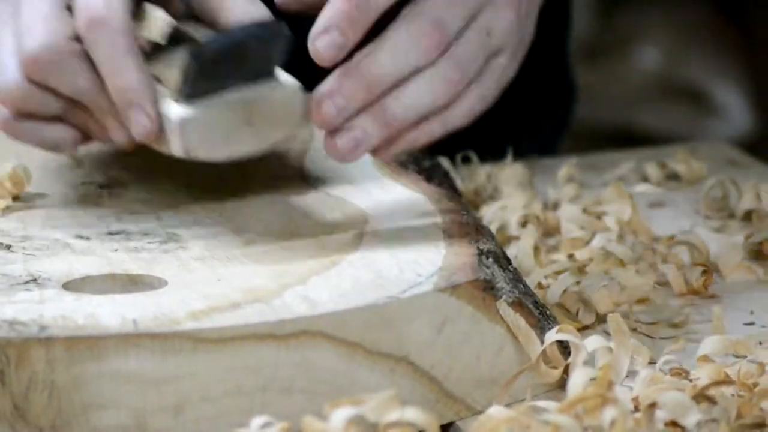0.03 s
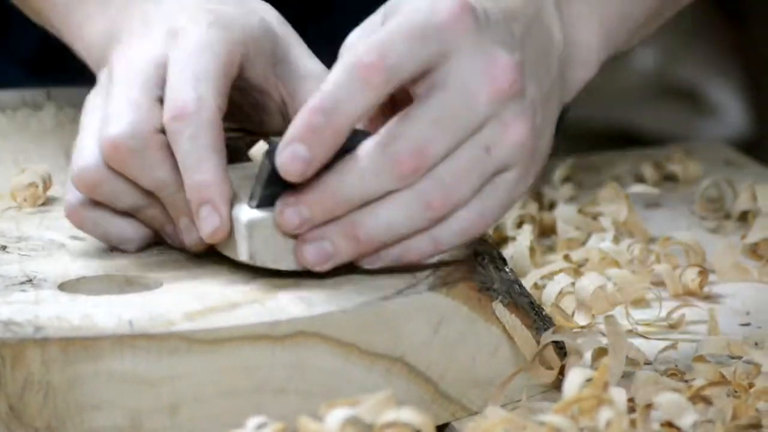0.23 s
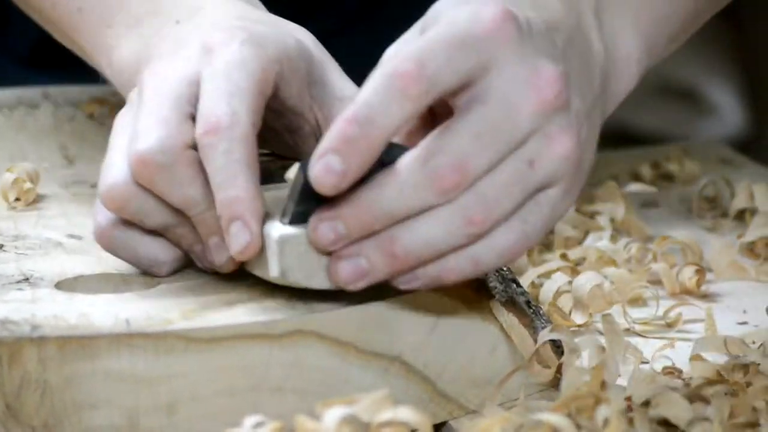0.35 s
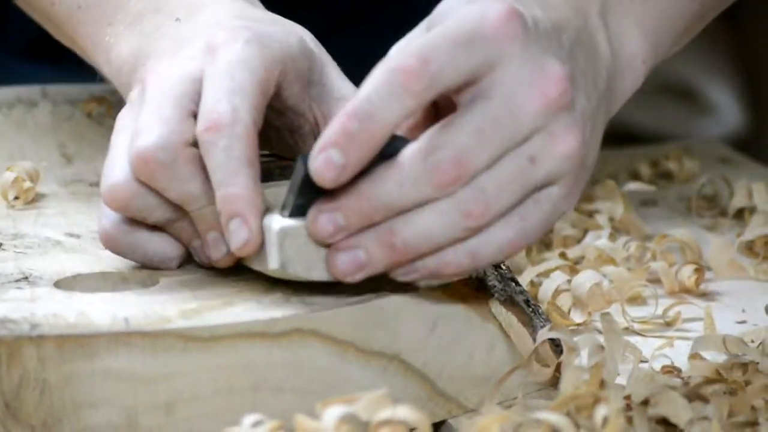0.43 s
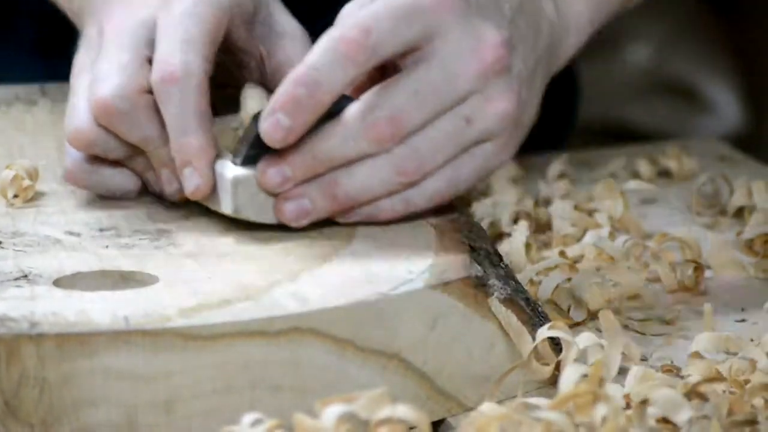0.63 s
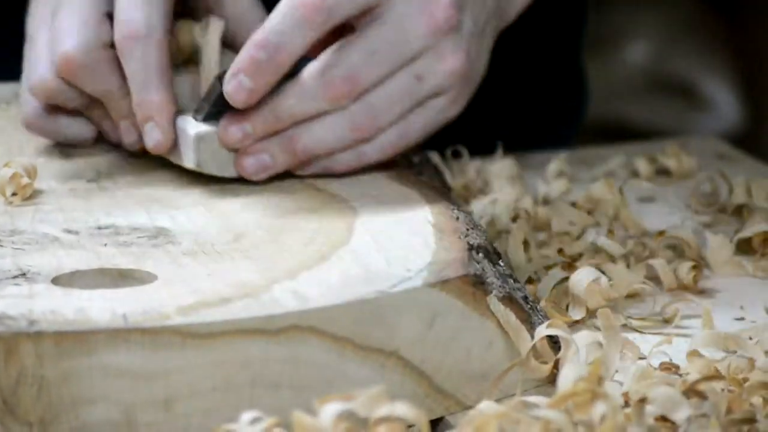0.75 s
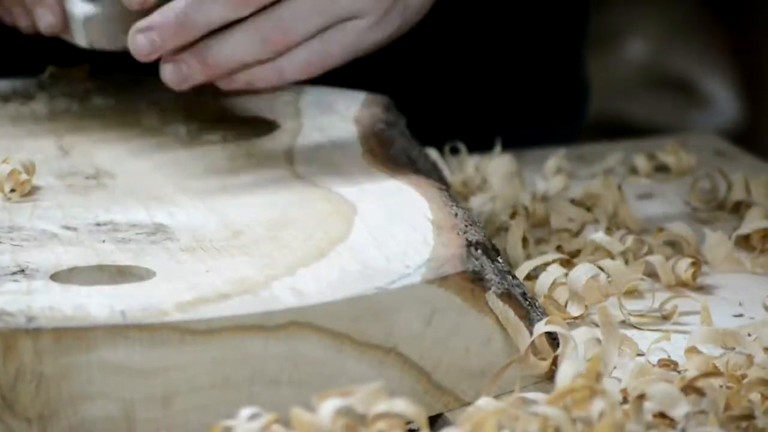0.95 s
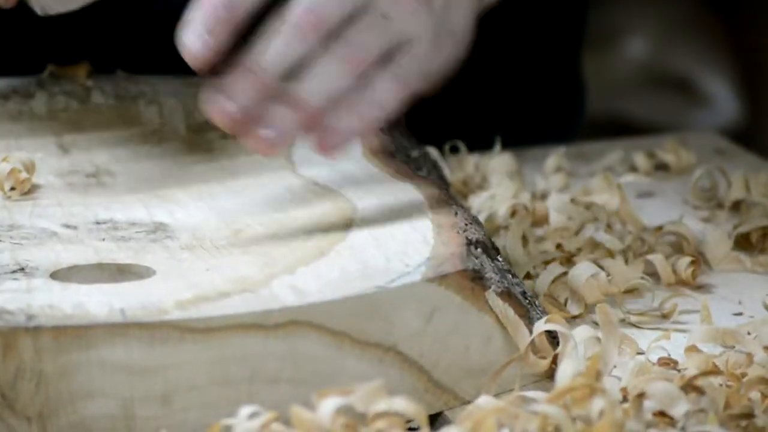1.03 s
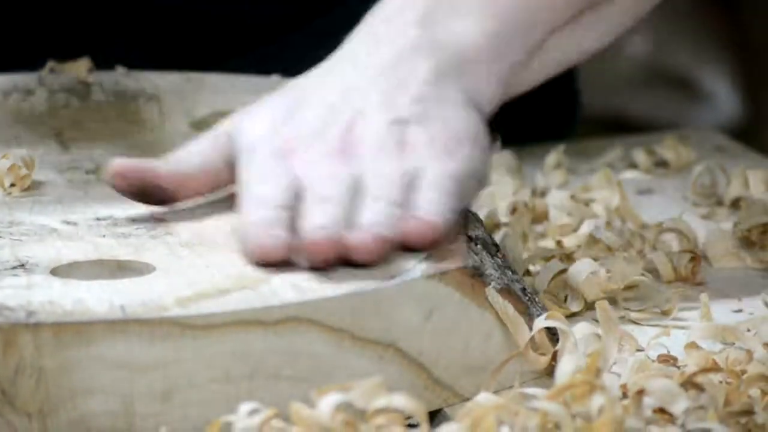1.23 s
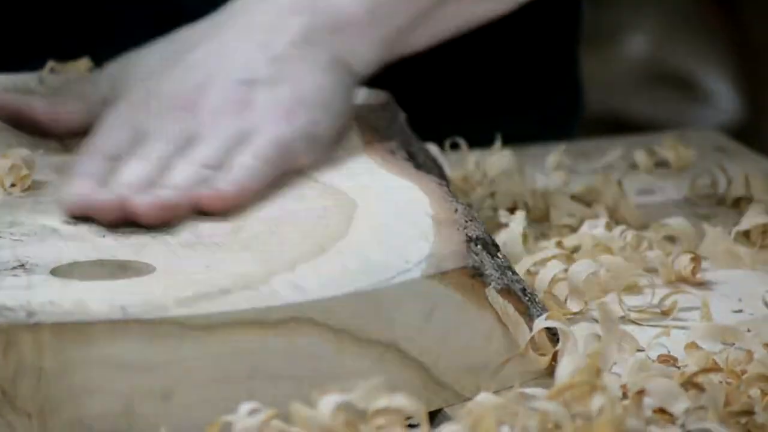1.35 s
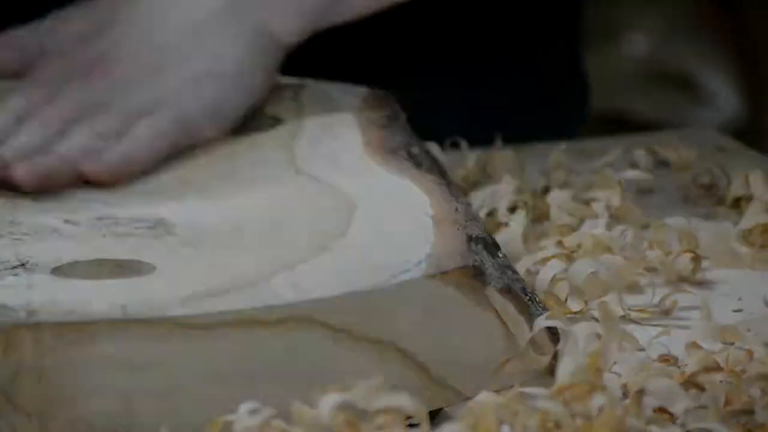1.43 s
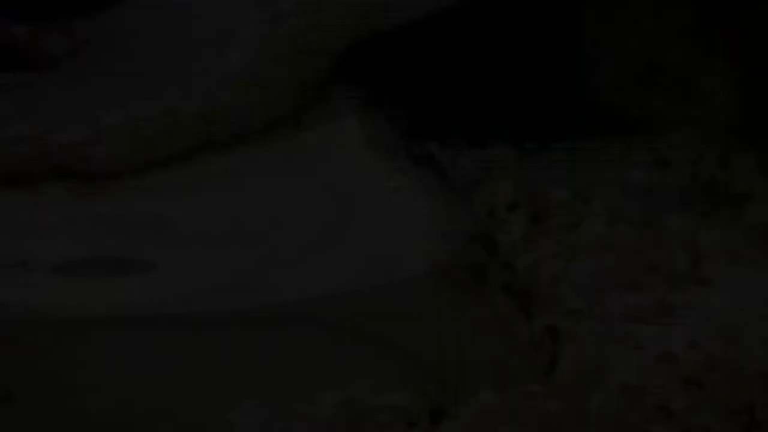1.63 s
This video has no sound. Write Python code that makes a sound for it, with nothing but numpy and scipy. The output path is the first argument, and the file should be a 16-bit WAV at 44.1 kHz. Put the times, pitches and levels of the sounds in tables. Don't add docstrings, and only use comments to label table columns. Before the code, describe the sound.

A small wooden hand plane knocks down, scrapes one shaving off thick wood, then a palm brushes

```python
import sys
import numpy as np
from scipy import signal
from scipy.fft import rfft, irfft
from scipy.io import wavfile
from scipy.ndimage import uniform_filter1d

SR = 44100
rng = np.random.default_rng(int(sys.argv[2]) if len(sys.argv) > 2 else 0)


def elevation(decibels):
    levels = np.asarray(decibels, float)
    return 10 ** (levels / 20)


def materialize(psi):
    bounded = np.clip(np.atleast_2d(psi).T, -1, 1)
    quanta = np.round(bounded * 32767).astype(np.int16)
    wavfile.write(sys.argv[1], SR, quanta)


N = 74970
T = np.arange(N) / SR
LEFT_RIGHT = np.array([[1], [-1]])

# frequency in Hz, level in dB, decay time t60 in s.
SEAT_MODES = [(148, -13, 0.21), (183, -10, 0.29), (220.4, -11, 0.42), (291.8, -6.5, 0.28), (328.6, 2, 0.27),
              (386.2, 2.5, 0.14), (476, -33.5, 0.4), (530, -16, 0.25), (647.6, 1.5, 0.17),
              (691.6, -12, 0.27), (765, -1.5, 0.096), (988, -50, 0.026), (1139, -9, 0.21),
              (1085, -23, 0.052)]
PRESSED_T60_SHARE, CONTACT_WANDER_DB = 0.65, 2.5


def level(x, db):
    return x * elevation(db) / np.sqrt(np.mean(x ** 2))


def curve(rows):
    times, db = np.array(rows).T
    return elevation(np.interp(T, times, db))


def colour(x, points):
    hz, db = np.array(points).T
    f = np.maximum(np.fft.rfftfreq(x.shape[-1], 1 / SR), 1)
    gain = elevation(np.interp(np.log(f), np.log(hz), db))
    return irfft(rfft(x) * gain, x.shape[-1])


def ring(x, hz, t60):
    radius = np.exp(-np.log(1000) / (t60 * SR))
    angle = 2 * np.pi * hz / SR
    return signal.lfilter([0, radius * np.sin(angle)], [1, -2 * radius * np.cos(angle), radius ** 2], x)


def walk(rate):
    hold = int(SR / rate)
    steps = np.repeat(rng.standard_normal(N // hold + 1), hold)
    smooth = uniform_filter1d(uniform_filter1d(steps, hold), hold)[:N]
    return smooth / smooth.std()


def grains(rate, spread_db):
    chance, size, sign = rng.random(N), rng.exponential(size=N), rng.standard_normal(N)
    clicks = np.clip(1 - chance * SR / rate, 0, 1) ** 0.5
    return level(clicks * elevation(spread_db * size) * sign, 0)


def body(modes, force, t60_share, wander_db):
    total = np.zeros(N)
    for k, (hz, db, t60) in enumerate(modes):
        drive = force * elevation(wander_db * walk(22.6))
        total += (-1) ** k * elevation(db) * ring(drive, hz, t60 * t60_share)
    return total


def workshop():
    # frequency in Hz, level in dB.
    murmur = [(15, -68), (25, -27), (148, -17), (276, -5.5), (361, -2), (425, -10.5), (654, -6),
              (7420, -30.5), (15800, -42)]
    # frequency in Hz, dB below the common murmur.
    murmur_side = [(30, -6), (250, -15.5), (2000, -4), (8000, -2.5), (15000, -2)]
    rise_db_per_s = 0.2
    whine_hz, whine_db = 15671, -76
    mid, side = colour(rng.standard_normal((2, N)), murmur)
    air = level(mid + colour(side, murmur_side) * LEFT_RIGHT, -51.5) * elevation(rise_db_per_s * T)
    phase = np.array([[0], [0.6]])
    return air + elevation(whine_db) * np.sqrt(2) * np.sin(2 * np.pi * whine_hz * T + phase)


def knocks():
    # start in s, level in dB, contact time in ms,
    # favoured pitch in Hz, free ringing before the hand damps it in s.
    contacts = [(0.2268, -21, 0.33, 330, 0.029), (0.2319, -12, 1.17, 301, 0.029),
                (.233, -21.5, 0.47, 664, 0.046), (0.2405, -29, 1.8, 447, 0.011),
                (0.251, -16, 2.2, 155, 0.028), (0.297, -30, 0.93, 210, 0.045),
                (.3675, -22.5, 0.87, 321, 0.12), (0.374, -13.5, 0.86, 183, 0.2),
                (0.395, -24, 0.84, 185, 0.11), (0.557, -31, 0.33, 366, 0.012),
                (0.629, -37, 0.78, 320, 0.029), (0.676, -33.5, 0.64, 377, 0.044),
                (.817, -25.5, 1.14, 330, 0.0087), (0.832, -36, 0.42, 335, .02),
                (.87, -29, 0.91, 216, 0.037), (.903, -28, 1.2, 221, 0.041),
                (1.1923, -24.5, 1.65, 233, 0.0058), (1.199, -31, 2.1, 288, 0.0088),
                (1.204, -23.5, 2, 183, 0.096)]
    # frequency in Hz, level in dB.
    rattle_colour = [(88, -46.5), (150, -19), (339, -1.5), (681, -8.5), (948, -25), (1110, -15.5),
                     (1370, -35), (1480, -31.5), (15500, -85)]
    rattle_db, rattle_s, rattle_rise_s = -14.5, 0.025, 0.0037
    soft_rattle_drop = 2.2
    spot_db_per_oct2, far_modes_db = 69, -25.5
    damped_db, damp_s, damped_db_per_s = -13, 0.0036, -88
    first_ring_s = 0.042

    out = np.zeros(N)
    rattle = level(colour(rng.standard_normal(N), rattle_colour), rattle_db)
    for start, db, ms, spot_hz, free_s in contacts:
        if start < contacts[4][0]:
            free_s = min(free_s, contacts[0][0] + first_ring_s - start)
        phase = (T - start) / (ms / 1000)
        age = np.maximum(T - start, 0)
        push = np.where((phase > 0) & (phase < 1), np.sin(np.pi * phase) ** 2, 0) / (ms * SR / 2000)
        wood = np.zeros(N)
        for hz, mode_db, t60 in SEAT_MODES:
            spot_db = max(-spot_db_per_oct2 * np.log2(hz / spot_hz) ** 2, far_modes_db)
            wood += elevation(mode_db + spot_db) * ring(push, hz, t60)
        grip_db = damped_db / (1 + np.exp(np.clip((start + free_s - T) / damp_s, -40, 40)))
        held = elevation(grip_db + damped_db_per_s * np.maximum(age - free_s, 0))
        swell = (1 - np.exp(-age / rattle_rise_s)) * np.exp(-age / rattle_s)
        out += elevation(db) * (wood * held + rattle / ms ** soft_rattle_drop * swell)
    return out


def plane():
    # time in s, effort in dB.
    stroke = [(.226, -58), (.232, -16), (.31, -18), (.35, -30.5), (.372, -18.5), (.41, -34), (.465, -27),
              (.48, -16.5), (.5, -9), (.545, -1.5), (.59, 1), (.74, -1), (.808, -2.5), (.815, -4.5),
              (.86, -12), (.92, -27), (.97, -35), (1.05, -51)]
    # frequency in Hz, level in dB, decay time t60 in s.
    plane_modes = [(1210, -1, 0.034), (1467, -6, 0.13), (1627, 0, 0.034), (1864, 0, 0.053),
                   (2230, -2.5, 0.072), (2730, -18.5, 0.021), (2883, -5, 0.03), (3423, 4, 0.026),
                   (3744, 3.5, 0.018), (4550, 1.5, 0.005), (5100, -34.5, 0.008)]
    # frequency in Hz, level in dB, decay time t60 in s.
    mouth_modes = [(6300, 0, .004), (9200, -5, .0025), (10500, -4, .002)]
    # frequency in Hz, level in dB.
    shaving_colour = [(59, -61), (100, -23.5), (319, 8.5), (457, 3.5), (668, -15), (977, -3), (3540, -8),
                      (10400, -27.5), (15500, -64)]
    fibres_per_s, fibre_spread_db = 14000, 1
    judder_db, seat_judder_db = -1, 2.5
    cut_above_hz, mouth_top_hz = 188, 11500
    shaving_fade = 0.25

    effort = curve(stroke)
    judder = elevation(judder_db * walk(69))
    tear = grains(fibres_per_s, fibre_spread_db) * judder * effort
    chips = grains(fibres_per_s, fibre_spread_db) * judder * effort

    seat_force = tear * elevation(seat_judder_db * walk(38.94))
    quick = signal.lfilter(*signal.butter(2, cut_above_hz, "high", fs=SR), seat_force)
    seat = body(SEAT_MODES, quick, PRESSED_T60_SHARE, CONTACT_WANDER_DB)
    tool = body(plane_modes, tear, 0.83, 1.2)
    shaving = colour(chips * effort ** shaving_fade, shaving_colour)
    hollows = sum(elevation(db) * ring(tear, hz, t60) for hz, db, t60 in mouth_modes)
    mouth = signal.lfilter(*signal.butter(2, mouth_top_hz, fs=SR), np.gradient(hollows))
    return level(seat, -36.5) + level(tool, -39.5) + level(shaving, -39.5) + level(mouth, -52)


def palm():
    # time in s, level in dB.
    sweep = [(1.19, -93), (1.2, -57), (1.25, -57.5), (1.27, -51.5), (1.33, -44.5), (1.44, -44),
             (1.52, -49.5), (1.56, -54.5), (1.59, -67), (1.63, -61), (1.66, -56.5), (1.685, -49),
             (1.7, -56)]
    # time in s, level in dB.
    grip = [(1.2, -83), (1.27, -56), (1.4, -64), (1.55, -81), (1.63, -79), (1.67, -61), (1.69, -46),
            (1.7, -53)]
    # frequency in Hz, level in dB.
    hiss_colour = [(120, -35), (200, -3.5), (268, -39.5), (385, -12.5), (525, 1), (653, -2), (2170, 2),
                   (10400, -5), (15500, -17.5)]
    rub = grains(14400, 0.33)
    hiss = level(colour(rub, hiss_colour), 0)
    wood = np.gradient(body(SEAT_MODES, rub, PRESSED_T60_SHARE, CONTACT_WANDER_DB))
    return hiss * curve(sweep) + level(wood, 0) * curve(grip)


def room(x):
    room_db, width_db = -14, -21
    low_t60_s, high_t60_s, split_hz, rise_s = 0.9, 0.2, 5800, 0.0046
    t = T[:SR]
    tails = []
    for _ in range(2):
        noise = rng.standard_normal(len(t))
        low = signal.sosfilt(signal.butter(1, split_hz, fs=SR, output="sos"), noise)
        decay = low * elevation(-60 * t / low_t60_s) + (noise - low) * elevation(-60 * t / high_t60_s)
        response = decay * np.clip(t / rise_s, 0, 1)
        tails.append(signal.fftconvolve(x, response / np.sqrt(np.sum(response ** 2)))[:N])
    return elevation(room_db) * (tails[0] + elevation(width_db) * tails[1] * LEFT_RIGHT)


def scene():
    # frequency in Hz, dB below the common sound.
    port_side = [(100, -44.5), (500, -66), (2000, -22), (5000, -19), (9000, -11.5), (15000, -9)]
    radiates_above_hz, left_db = 138, 0.8
    slab = signal.butter(5, radiates_above_hz, "high", fs=SR, output="sos")
    near = signal.sosfilt(slab, knocks() + plane() + palm())
    scatter = rng.standard_normal(900) * np.exp(-np.arange(900) / 300)
    scattered = signal.fftconvolve(near, scatter / np.linalg.norm(scatter))[:N]
    pair = near + colour(scattered, port_side) * LEFT_RIGHT + room(near)
    return pair * elevation(left_db * LEFT_RIGHT / 2) + workshop()


def low_pass(x):
    return signal.sosfilt(signal.butter(12, 16170, fs=SR, output="sos"), x)


def record(dry):
    top_hz = 15830
    shut = signal.sosfilt(signal.ellip(8, 0.3, 70, top_hz, fs=SR, output="sos"), dry)
    return low_pass(shut)


dry = scene()
out = record(dry)
materialize(out)
```